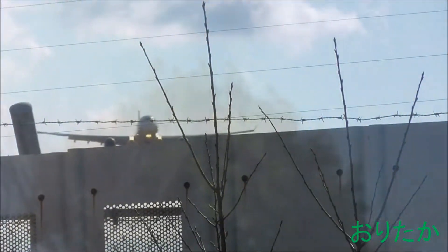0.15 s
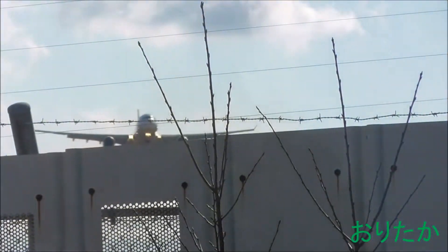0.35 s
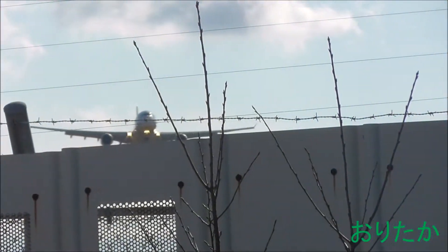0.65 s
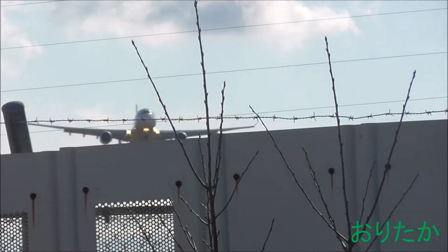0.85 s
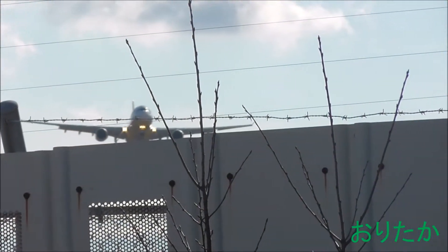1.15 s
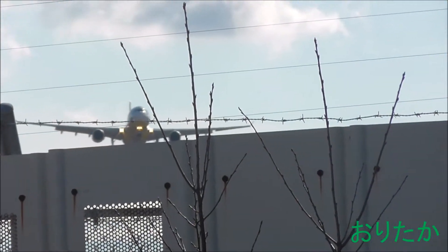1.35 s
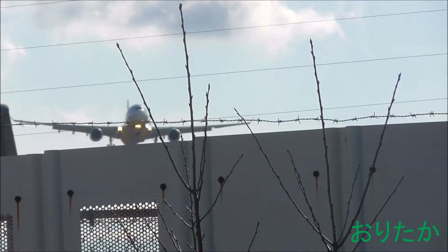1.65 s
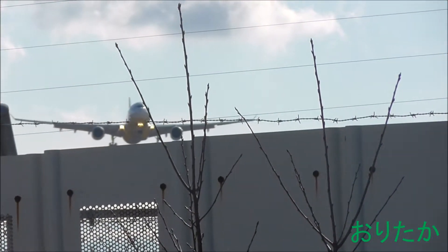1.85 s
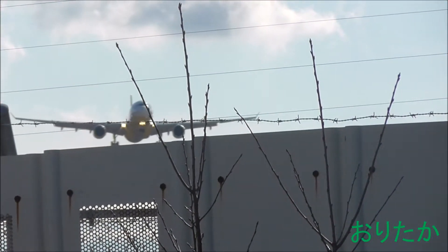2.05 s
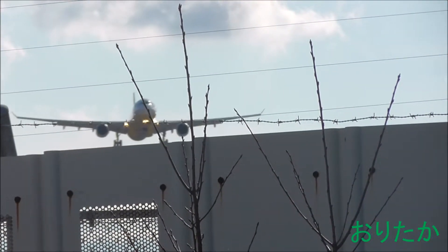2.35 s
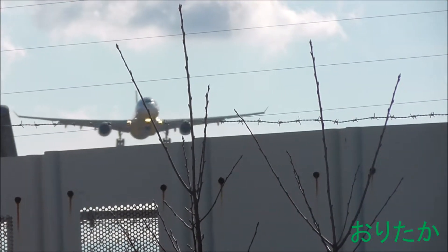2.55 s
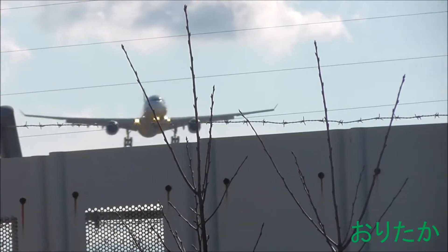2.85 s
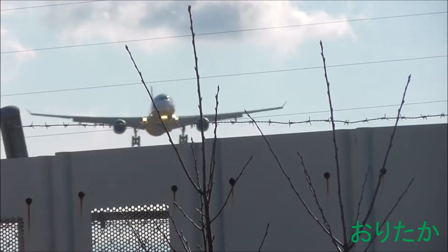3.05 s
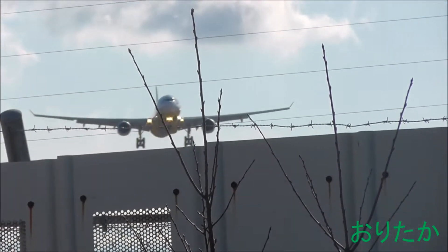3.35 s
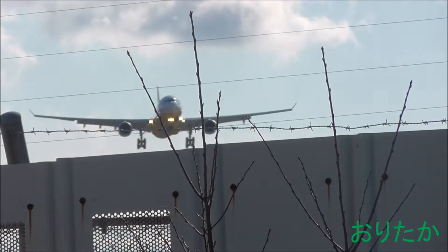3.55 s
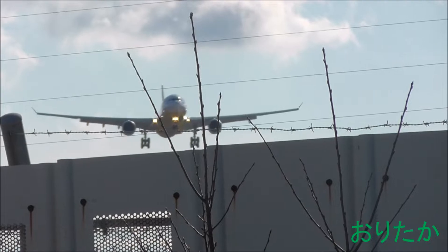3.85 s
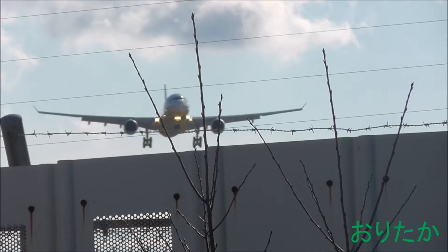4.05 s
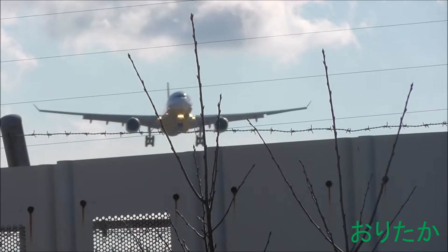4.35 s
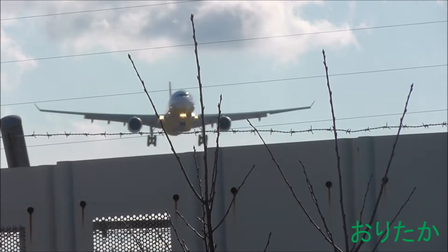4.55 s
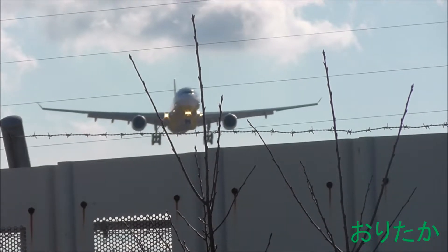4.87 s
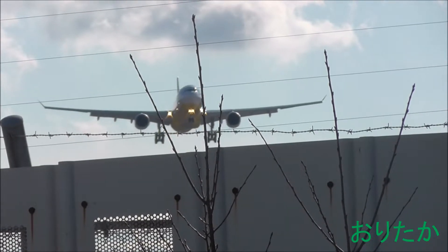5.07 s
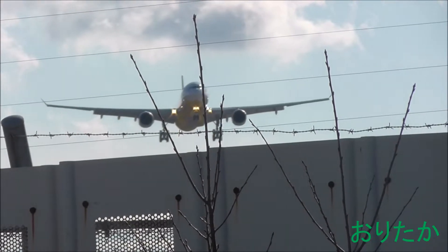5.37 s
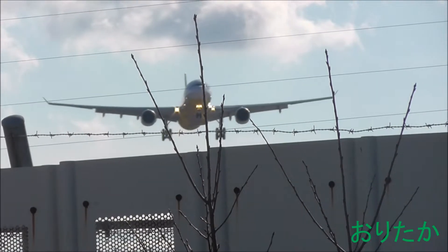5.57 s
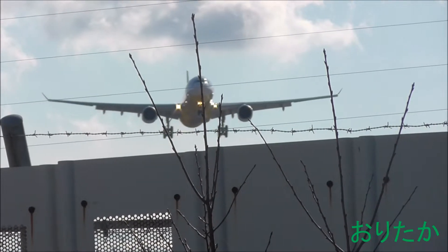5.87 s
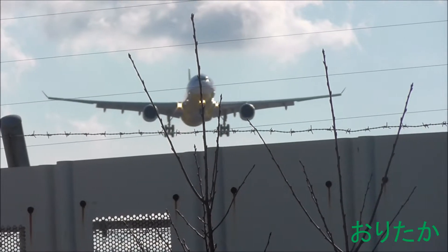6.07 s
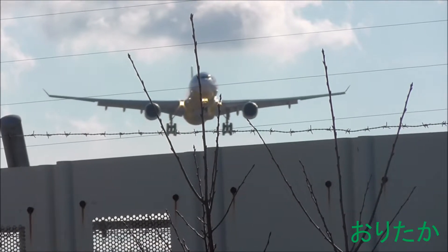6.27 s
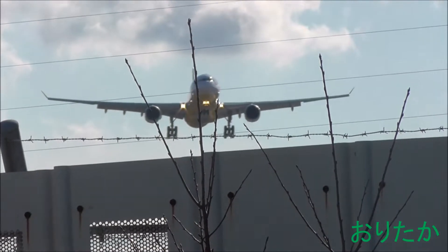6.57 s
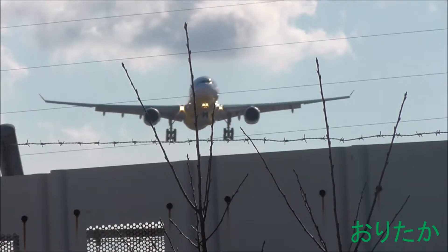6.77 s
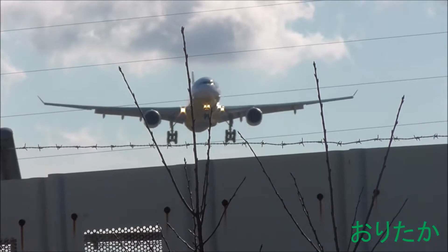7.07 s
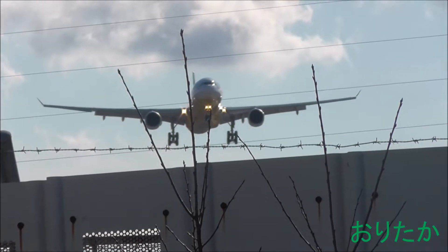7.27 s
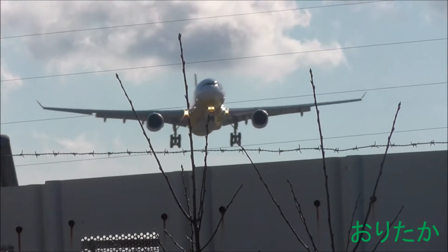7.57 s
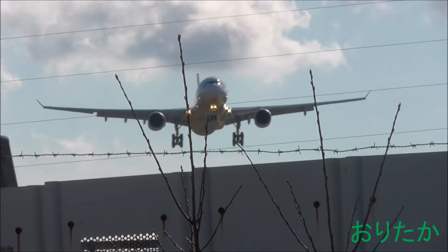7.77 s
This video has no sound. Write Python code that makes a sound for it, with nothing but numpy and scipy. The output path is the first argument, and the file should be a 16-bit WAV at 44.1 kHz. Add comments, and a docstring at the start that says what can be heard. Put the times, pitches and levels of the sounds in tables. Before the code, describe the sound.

A hand-held camera outdoors hears a jet landing. First a brief, strong roar from close by, cut off abruptly; then a bassy far-off engine rumble, gradually louder, surging and fading as the air moves. A blurred mid-pitched whine drifts through in waves above a low drone and slight hiss. Several dry case snaps and hollow knocks sound near the microphone, the sharpest making the level dip briefly.

```python
"""An airliner comes in to land: far rumble, as shaped noise, grows as 1 / distance and swells in uneven air.
A fan whine, a tone fuzzed by moving air, comes through in waves over a low drone and a faint hiss.
For the first 0.42 s a louder, nearer jet roar is heard instead, then it is cut off abruptly.
The case of a hand-held camera clicks (noise snaps, a ringing knock); its gain control dips after
sharp peaks and recovers slowly."""
import sys
import numpy as np
from scipy import signal
from scipy.fft import rfft, irfft
from scipy.io import wavfile
from scipy.ndimage import uniform_filter1d

SR = 44100
rng = np.random.default_rng(int(sys.argv[2]) if len(sys.argv) > 2 else 0)


def generate_wav(sig):
    """Save sig (samples, or channels by samples) to the path in sys.argv[1] as 16-bit PCM at SR."""
    pcm = np.round(np.clip(np.atleast_2d(sig).T, -1, 1) * 32767).astype(np.int16)
    wavfile.write(sys.argv[1], SR, pcm)


N = 349272
TIME = np.arange(N) / SR
FFT_SIZE, HOP = 2048, 512
FRAME_TIME = np.arange(N // HOP + 5) * HOP / SR
BIN_HZ = np.fft.rfftfreq(FFT_SIZE, 1 / SR)
CUT_S = 0.4245  # near jet ends, approaching jet starts

# far sound field at the two microphone ports: f/Hz, likeness/0-1, left lead/rad, left minus right/dB
FAR_PORTS = [(40, 0.85, 0.1, -1), (90, 0.96, 0, -0.2), (180, 0.95, 0.1, 0), (350, 0.9, -0.3, -0.3),
             (700, 0.66, 0.2, 1.2), (1200, 0.5, 0.2, 2.3), (2000, 0.47, -0.2, 0.8), (4000, 0.46, -1, -1.2),
             (7000, 0.49, -2.4, 0), (10000, 0.28, -2.8, 0.9), (14000, 0.1, -4.4, 1.7)]


def gain_of(db):
    """Decibels to amplitude."""
    return 10 ** (np.asarray(db) / 20)


def evened(x):
    """Scales to rms 1."""
    return x / np.sqrt(np.mean(x ** 2) + 1e-20)


def bell(x, centre, half_width):
    """A smooth rise and fall of height 1, down to 1/e at the half width."""
    return np.exp(-((x - centre) / half_width) ** 2)


def read(points, hz):
    """Reads a spectrum on a log-frequency axis."""
    f, value = np.transpose(points)
    return np.interp(np.log(hz + 1), np.log(f + 1), value)


def add(mix, s, sound):
    """Mixes a stereo sound in at time s."""
    part = mix[:, round(s * SR):][:, :sound.shape[1]]
    part += sound[:, :part.shape[1]]


def drift(rate_hz):
    """Slow random wander of rms 1: noise under a Gaussian low-pass."""
    hz = np.fft.rfftfreq(N, 1 / SR)
    spectrum = rfft(rng.standard_normal(N))
    return evened(irfft(spectrum * np.exp(-(hz / rate_hz) ** 2), N))


def air_noise(spectrum, ports, patchy_db, lift_db=0):
    """Turbulent noise at two close microphone ports; rms 1 until lifted over time and frequency."""
    a, b, c, d, patches = rng.standard_normal((len(FRAME_TIME), len(BIN_HZ), 5)).T
    patches = uniform_filter1d(patches, size=3, axis=0)
    patches = evened(uniform_filter1d(patches, size=12, axis=1))
    hz, *columns = np.transpose(ports)
    same, lead_rad, lean_db = (read(np.c_[hz, column], BIN_HZ)[:, None] for column in columns)
    left = a + 1j * b
    # the right port shares part of the left's noise, delayed in phase
    right = same * left + np.sqrt(1 - same ** 2) * (c + 1j * d)
    right = right * np.exp(-1j * lead_rad)
    z = np.array([left * gain_of(lean_db / 2), right / gain_of(lean_db / 2)])
    z *= gain_of(read(spectrum, BIN_HZ)[:, None] + patchy_db * patches)
    pair = np.array([z, z * gain_of(lift_db)])
    plain, lifted = signal.istft(pair, nperseg=FFT_SIZE, noverlap=FFT_SIZE - HOP)[1][..., :N]
    return lifted / plain.std()


def fuzzy_tone(hz, width_hz, steady):
    """A tone through moving air: a direct part plus scattered parts of wandering phase; rms 1."""
    phase_rad = 2 * np.pi * np.cumsum(hz * np.ones(N)) / SR
    in_phase = (steady + drift(width_hz)) * np.cos(phase_rad)
    return evened(in_phase + drift(width_hz) * np.sin(phase_rad))


def nearness_db(t):
    """Level gained since the start as 1 / distance, at a steady closing speed."""
    start_m, speed_m_per_s = 2130, 69
    distance_ratio = np.maximum(1 - speed_m_per_s * t / start_m, 1 / 10)
    return -20 * np.log10(distance_ratio)


def jet_noise(level_db=-23, rumble_hz=135):
    """Exhaust and airframe noise grows as the jet nears, the bass most; uneven air focuses parts of it."""
    # far jet spectrum: f/Hz, level per Hz/dB
    jet_spectrum = [(20, -33), (42, -17.5), (65, -10.5), (90, -1.5), (135, -1), (180, -1.03), (260, -4),
                    (400, -7.5), (560, -10), (720, -13), (1000, -17.5), (1380, -24), (1750, -37),
                    (2100, -37), (2800, -49), (5000, -64)]
    # swells: t/s, half length/s, centre f/Hz, half width/octaves, lift/dB
    swells = [(1.35, 0.39, 128, 0.6, 3), (3.215, 0.12, 474, 0.24, 11.5), (3.25, 0.17, 140, 0.5, 3.5),
              (4.25, 0.54, 38, 0.62, 8), (4.315, 0.45, 368, 0.65, 8), (4.705, 0.18, 116, 0.55, 5.5),
              (5.037, 0.18, 490, 0.35, 5), (5.446, 0.53, 115, 1.6, 4), (5.904, 0.15, 370, 0.41, 8),
              (6.35, 0.33, 307, 0.25, 4), (6.476, 0.094, 105, 0.6, 6.5), (7.19, 0.23, 336, 0.48, 8),
              (7.428, 0.25, 180, 0.98, 4.5)]
    rise_db_per_s, waver_db, waver_hz = 0.27, 0.5, 2
    t, hz = FRAME_TIME, BIN_HZ[:, None] + 1
    rumble_db = rise_db_per_s * (t - t.mean())
    rumble_db = rumble_db + waver_db * np.interp(t, TIME, drift(waver_hz))
    lift_db = nearness_db(t) + rumble_db / (1 + (hz / rumble_hz) ** 4)
    for s, half_s, centre_hz, octaves, db in swells:
        band = bell(np.log2(hz), np.log2(centre_hz), octaves)
        lift_db = lift_db + db * band * bell(t, s, half_s)
    return gain_of(level_db) * air_noise(jet_spectrum, FAR_PORTS, patchy_db=1.15, lift_db=lift_db)


def fan_whine(base_db=-43):
    """Fan tone, sinking as the line of sight steepens: one common part, one scattered part per channel."""
    # waves of whine: t/s, half length/s, lift/dB
    whine_waves = [(1.48, 0.15, 8), (3.276, 0.19, 9), (5.956, 0.88, 9), (7.53, 0.078, 12.5)]
    start_hz, sag_hz_per_s, wobble_hz = 794.5, 2.8, 2
    hz = start_hz - sag_hz_per_s * TIME
    waves_db = sum(db * bell(TIME, s, half_s) for s, half_s, db in whine_waves)
    level_db = base_db + nearness_db(TIME) + waves_db
    common = fuzzy_tone(hz + wobble_hz * drift(6), width_hz=15, steady=1.9)
    scattered = np.array([fuzzy_tone(hz, width_hz=20, steady=0) for _ in range(2)])
    return gain_of(level_db) * (common + 0.55 * scattered)


def engine_drone(base_db=-40, drone_hz=152.1):
    """Low engine tone fuzzed by moving air, strongest in the middle of the approach."""
    crest_s, half_s, lift_db = 3.9, 1.6, 9
    level_db = base_db + lift_db * bell(TIME, crest_s, half_s)
    return gain_of(level_db) * fuzzy_tone(drone_hz, width_hz=5.6, steady=0.92)


def near_jet(level_db=-11):
    """The roar of a jet close by, as turbulent noise still building up to the cut."""
    # near jet spectrum: f/Hz, level per Hz/dB
    near_spectrum = [(15, -53), (25, -23), (119, -7.5), (209, -1.5), (399, -7), (482, -11.5), (782, -9.5),
                     (1140, -20), (1620, -26), (1750, -29), (2850, -38), (4620, -36), (5580, -45),
                     (10100, -51), (15500, -60)]
    # near sound field at the two ports: f/Hz, likeness/0-1, left lead/rad, left minus right/dB
    near_ports = [(40, 0.2, 0, -3), (90, 0.45, 0, -2.8), (180, 0.87, 0.2, -1.6), (350, 0.92, 0.2, -2.5),
                  (700, 0.74, 0.4, 1.7), (2000, 0.46, 0, 2.8), (4000, 0.38, 0, 1.3),
                  (14000, 0.05, -2.4, 0.6)]
    build_db = np.interp(TIME, [0, CUT_S], [-0.5, 1.0])
    return gain_of(level_db + build_db) * air_noise(near_spectrum, near_ports, patchy_db=2.0)


def case_clicks(knock_t60_s=0.013, snap_t60_s=0.01, rattle_t60_s=0.082, rise_s=0.0008):
    """Plastic slips with a snap and a short rattle; the shell knocks, mostly at the right port."""
    # clicks: t/s, snap before trim/dB, tilt/(dB/octave), panel resonance f/Hz, rattle re snap/dB,
    # knock before panning/dB
    clicks = [(0.222, -19, 2, 9100, -15, -45), (2.4102, -24.5, 0.5, 4900, -22, -42),
              (2.594, -19.5, 1.5, 1900, -23, -22), (2.7145, -22, 1.5, 2230, -2, -4),
              (2.8103, -22, 0, 4200, -8, -15), (2.8135, -12.5, 3, 5240, -16, -0.5),
              (3.873, -37, 3, 6000, -10, -55), (5.5716, -35, 0, 3980, -5, -55),
              (6.2253, -18.5, 0, 3530, -9.5, 0), (6.251, -16.5, -1.5, 3800, -9.5, -12)]
    # snap colour of the plastic: f/Hz, level per Hz/dB
    snap_spectrum = [(300, -31), (1100, 7.5), (1800, 3), (2400, 4), (2900, -1), (3900, 4.5), (5200, -1),
                     (6800, -5), (8700, -2), (12000, -7), (16000, -17)]
    knock_hz, panel_db, panel_octaves, trim_db = 867, 5, 0.15, -2.5
    snap_pan_db, knock_pan_db = [[1], [-1]], [[-4], [4]]  # left, right
    out, t = np.zeros((2, N)), np.arange(4096) / SR
    bins_hz = np.fft.rfftfreq(len(t), 1 / SR) + 1
    ring = np.sin(2 * np.pi * knock_hz * t + np.array([[1.1], [0]])) * gain_of(knock_pan_db)
    for s, snap_db, tilt_db, panel_hz, rattle_db, knock_db in clicks:
        octaves = np.log2(bins_hz / panel_hz)
        panel_lift_db = panel_db * bell(octaves, 0, panel_octaves)
        colour = gain_of(read(snap_spectrum, bins_hz) + tilt_db * octaves + panel_lift_db)
        random_phase = np.exp(2j * np.pi * rng.random((2, len(bins_hz))))
        grit = evened(irfft(colour * random_phase))
        decay = gain_of(-60 * t / snap_t60_s) + gain_of(rattle_db - 60 * t / rattle_t60_s)
        snap = gain_of(snap_db + trim_db) * gain_of(snap_pan_db) * grit * decay
        onset = 1 - np.exp(-(t / rise_s) ** 2)
        knock = ring * gain_of(knock_db - 60 * t / knock_t60_s) * onset
        add(out, s, snap + knock)
    return out


def faint_hiss(base_db=-49.5):
    """Faint high noise that swells once, midway."""
    # hiss spectrum: f/Hz, level per Hz/dB
    hiss_spectrum = [(20, -1), (3000, -1), (4200, 2.2), (5000, 1), (6300, -2.7), (8400, 0.3), (10000, -1),
                     (12000, -2.3), (14000, -7.5), (16000, -11)]
    crest_s, half_s, lift_db = 4.48, 0.41, 2
    level_db = base_db + lift_db * bell(TIME, crest_s, half_s)
    return gain_of(level_db) * air_noise(hiss_spectrum, FAR_PORTS, patchy_db=2.0)


def scene():
    """The near jet gives way abruptly to the approaching one; clicks run across both."""
    after_cut = np.clip((TIME - CUT_S) / 0.001, 0, 1)  # 1 ms crossfade
    approach = jet_noise() + fan_whine() + engine_drone() + faint_hiss()
    return after_cut * approach + (1 - after_cut) * near_jet() + case_clicks()


def record(dry, threshold_db=-4.0, recovery_db_per_s=12.0, edge_hz=15800):
    """Gain control dips after sharp peaks and recovers slowly; then clipping and the band limit."""
    peak_db = 20 * np.log10(abs(dry).max(0) + 1e-9)
    fall_db = TIME * recovery_db_per_s
    over_db = np.zeros(N)
    for part in np.split(np.arange(N), [round(CUT_S * SR)]):  # starts afresh at the cut
        held_db = np.maximum.accumulate((peak_db + fall_db)[part]) - fall_db[part]
        over_db[part] = np.maximum(held_db - threshold_db, 0)
    dip_db = signal.lfilter([0.005], [1, -0.995], over_db)  # about 5 ms attack
    limited = np.clip(dry / gain_of(dip_db), -1, 1)
    band_limit = signal.firwin(511, edge_hz, window=("kaiser", 9), fs=SR)
    return signal.oaconvolve(limited, band_limit[None], "same")


dry = scene()
out = record(dry)
generate_wav(out)
```